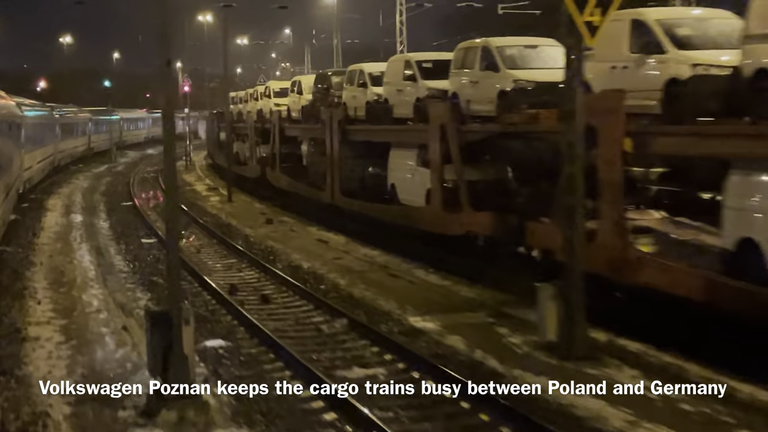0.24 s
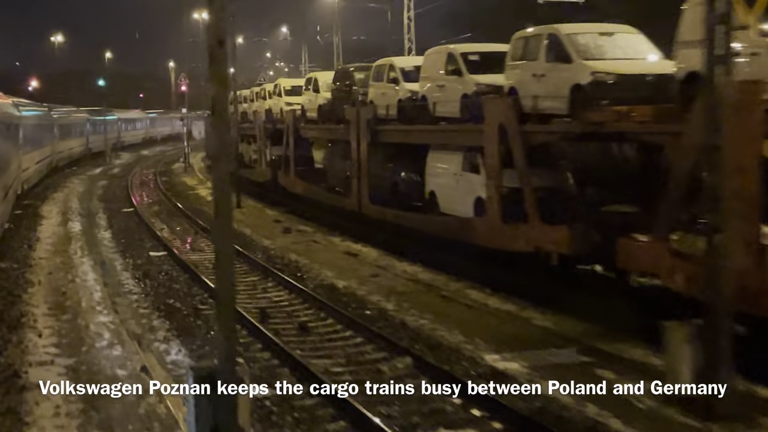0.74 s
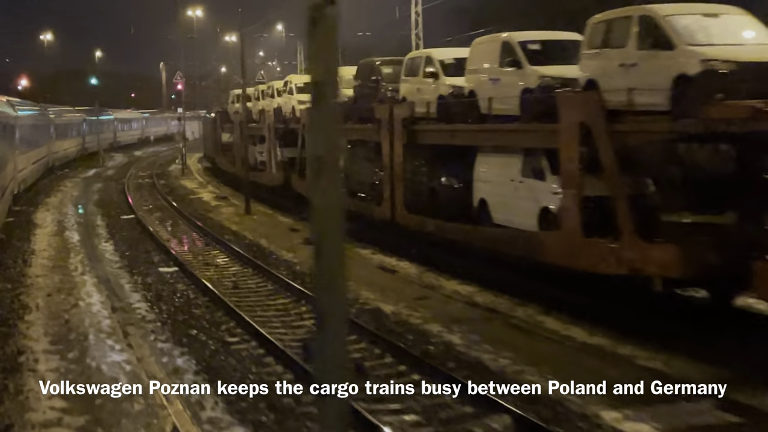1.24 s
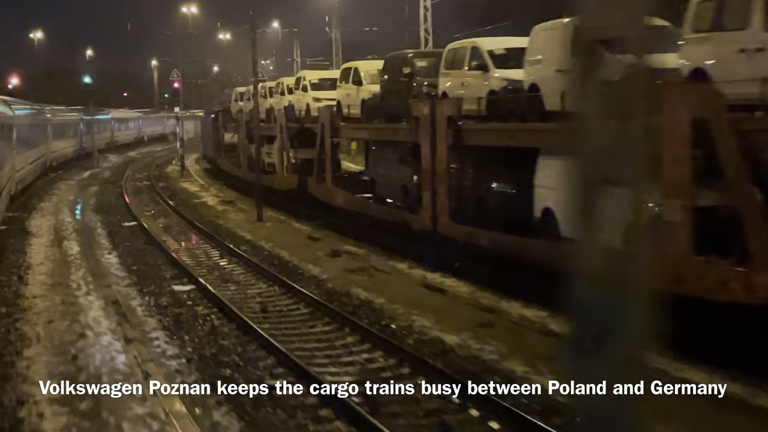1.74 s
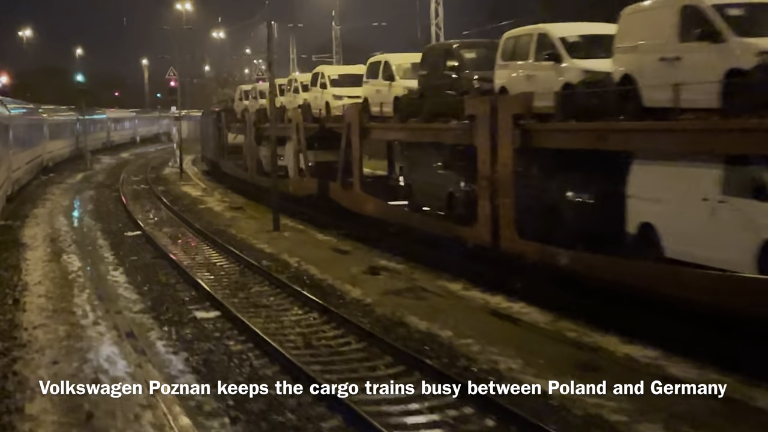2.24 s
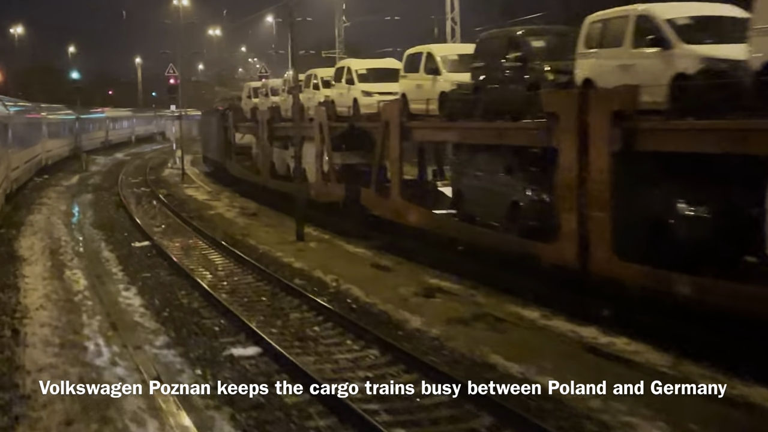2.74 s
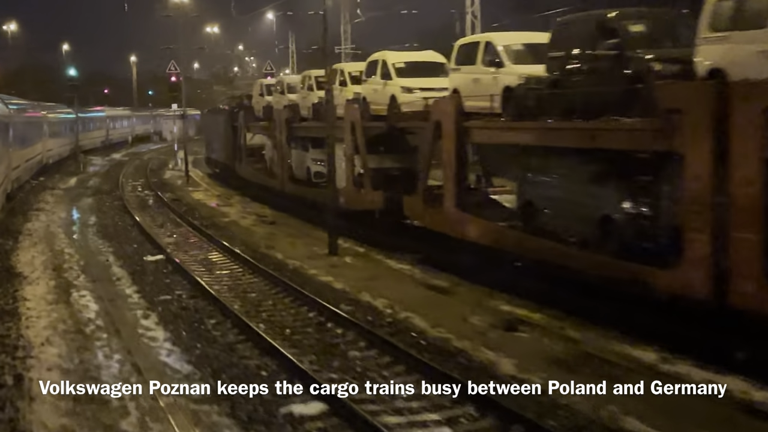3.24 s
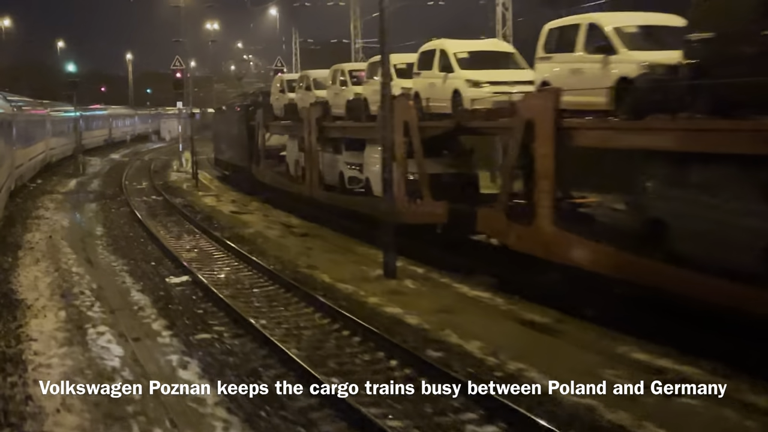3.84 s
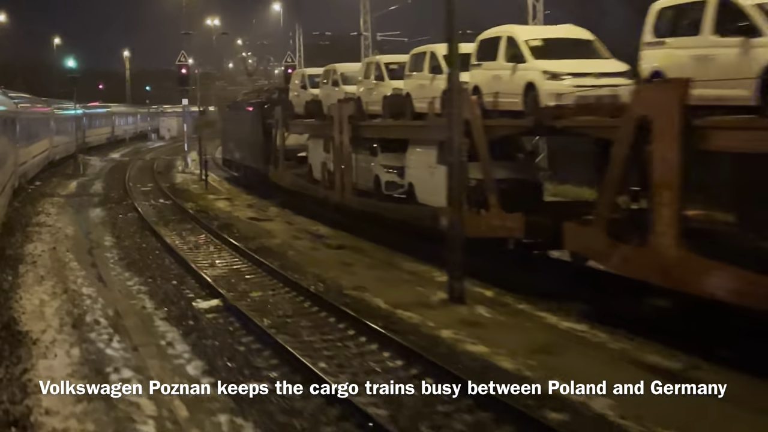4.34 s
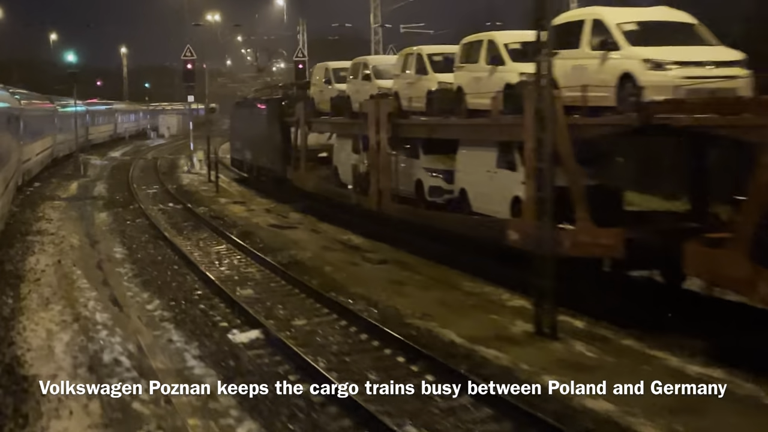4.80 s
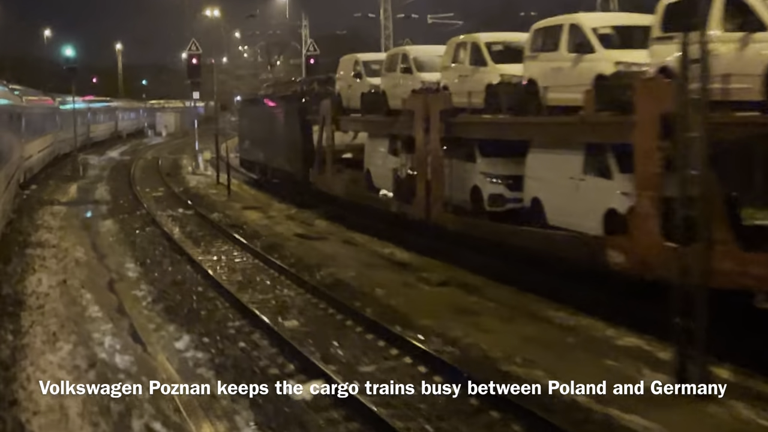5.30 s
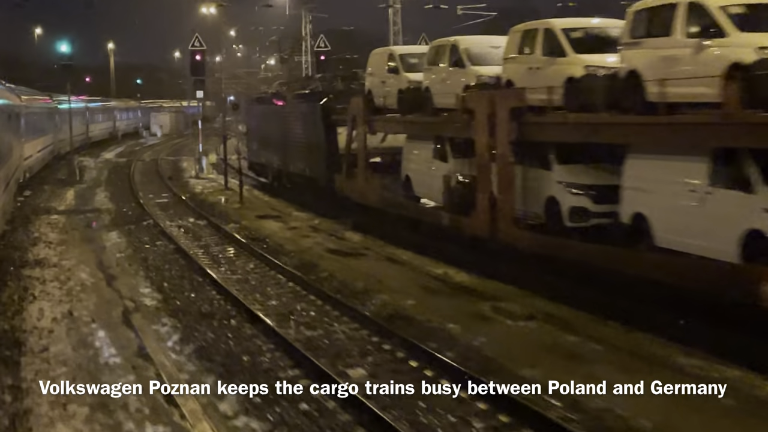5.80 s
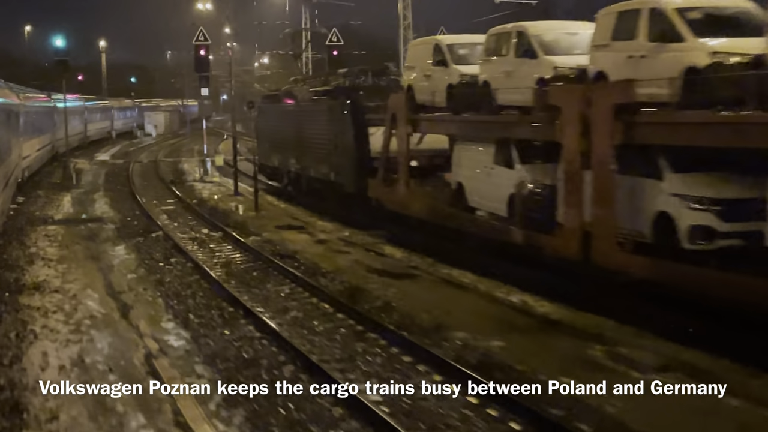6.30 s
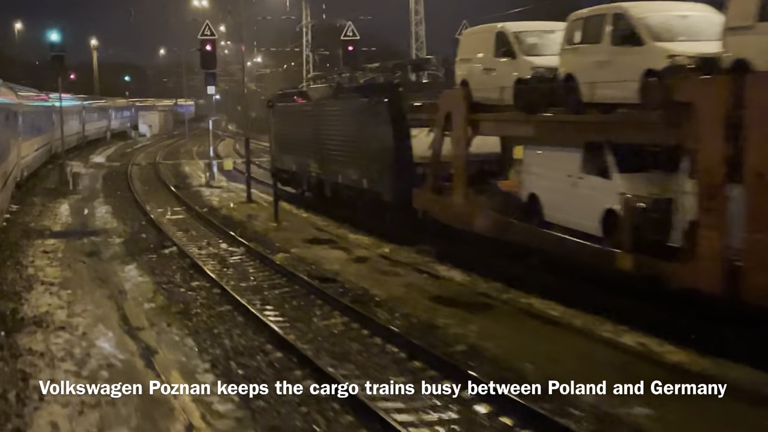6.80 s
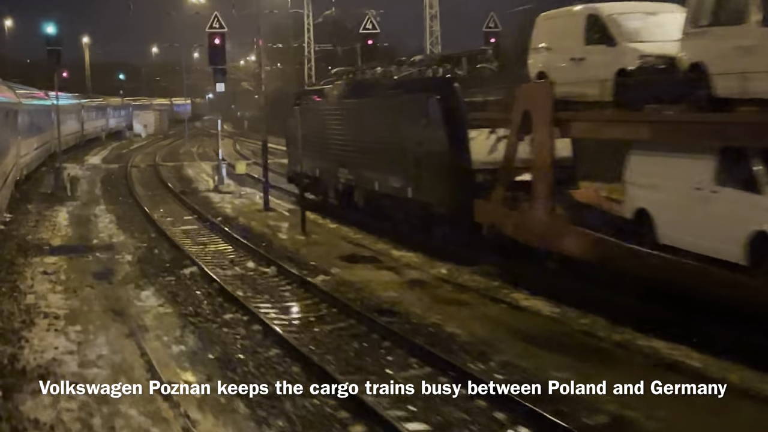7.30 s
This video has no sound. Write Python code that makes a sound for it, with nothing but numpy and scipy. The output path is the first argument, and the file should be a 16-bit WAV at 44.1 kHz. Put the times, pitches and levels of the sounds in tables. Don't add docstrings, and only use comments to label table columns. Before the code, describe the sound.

A train rolls steadily through an open rail yard, heard through a small stereo microphone at an open window. From 0 to about 7.5 seconds a rough bass rumble and boxy boom of the car body continues, wavering slightly, dipping near 1 second. A thin, steady metallic wheel whine rings high above it, with faint air and rail hiss. Wind strikes the microphone throughout: deep soft thumps, dull thuds and short ragged pops falling in pitch, scattered irregularly over many weaker ones. Tiny high wheel squeals flicker around 2.2 seconds, a softer longer one near 2.8, and lower ones near 4.2 and 4.8. A heavy thud lands about 4.15, and the sharpest pop snaps at 6.55. Rolling grows a little fuller after 5.3, and from 7 seconds buffeting and hiss rise, ending still in motion.

```python
import sys
import numpy as np
from scipy import signal
from scipy.fft import rfft, irfft, next_fast_len
from scipy.io import wavfile
from scipy.ndimage import uniform_filter1d, map_coordinates

SR = 44100
rng = np.random.default_rng(int(sys.argv[2]) if len(sys.argv) > 2 else 0)


def file_out(sig):
    cols = np.atleast_2d(sig).T
    lim = np.clip(cols, -1, 1)
    pcm = np.round(lim * 32767).astype(np.int16)
    wavfile.write(sys.argv[1], SR, pcm)


def elevation(decibels):
    levels = np.asarray(decibels, float)
    return 10 ** (levels / 20)


N = 332955


def unit(x):
    return x / np.sqrt(np.mean(x ** 2) + 1e-20)


def along(points, hz):
    f, v = np.transpose(points)
    return np.interp(np.log(hz + 1), np.log(f + 1), v)


def curves(rows):
    s, *columns = np.transpose(rows)
    return [np.interp(np.arange(N) / SR, s, column) for column in columns]


def wobble(rate):
    knots = rng.standard_normal(int(N * 200 / SR) + 4)
    return map_coordinates(knots, [np.arange(N) * rate / SR])


def filtered(x, response):
    m = next_fast_len(N + SR // 2)
    return irfft(rfft(x, m) * response(np.fft.rfftfreq(m, 1 / SR)), m)[..., :N]


def noise(gain, patchy_db, channels=1):
    z = signal.stft(rng.standard_normal((channels, N)), nperseg=512)[2]
    field = uniform_filter1d(rng.standard_normal(z.shape[1:]), size=4, axis=0)
    field = uniform_filter1d(field, size=10, axis=1)
    patchy = signal.istft(z * elevation(patchy_db * unit(field)), nperseg=512)[1][:, :N]
    return unit(filtered(patchy, gain))


def hump(hz, centre, width):
    return 1 / (1 + (2 * (hz - centre) / width) ** 2)


# (time [s], buffeting level [dB], rolling level [dB])
DRIVE = [(0.0, -38, -33), (.5, -39.5, -33.5), (1.01, -40, -37.5), (1.6, -41, -34), (2.08, -35.5, -33.5),
         (2.9, -38, -33), (3.3, -36.5, -33), (3.7, -36, -34), (4.5, -34, -34.5), (4.84, -38, -33),
         (5.28, -37, -30.5), (5.57, -38.5, -33), (6.2, -35.5, -30), (6.8, -40.5, -32.5), (7.15, -31.5, -31),
         (7.55, -30.5, -30)]
# (frequency [Hz], level per Hz [dB])
BODY_COLOUR = [(53, -72), (90, -6.5), (156, -21), (249, -3.5), (408, -3), (512, -6.5), (609, -10),
               (1340, -20.5), (1620, -20), (1870, -33), (2200, -45), (2860, -23), (4840, -120)]
# (frequency [Hz], width [Hz], lift [dB])
BODY_BOOMS = [(238.3, 13, 8), (501, 41, 5), (838, 210, 6)]


def rolling():
    def body(hz):
        booms_db = sum(db * hump(hz, centre, width) for centre, width, db in BODY_BOOMS)
        return elevation(along(BODY_COLOUR, hz) + booms_db)

    rolling_db = curves(DRIVE)[1]
    return elevation(rolling_db - 1.5 + 0.8 * wobble(18)) * noise(body, patchy_db=1.5)


# (time [s], wheel ring level [dB], hiss level [dB])
WHINE = [(0.0, -37.5, -62.5), (7.08, -37.5, -58.5), (7.55, -38.5, -56.5)]
WHEEL_PITCHES = [1560, 1650, 1780, 2300, 2770, 2830, 2851, 2960, 3110, 3153, 3250, 3340, 4050, 4147, 4140,
                 4250, 6000, 6120, 6050, 8295, 8300, 8950, 12440]
# (width [Hz], level [dB])
WHEEL_MODES = [(120, -18.5), (70, -16), (40, -19), (140, -20), (64.8, -14.5), (70, -4.5), (13.1, 3),
               (129, -11), (240, -11), (38, -11), (90, -19.5), (90, -15.5), (107, -19.5), (17.28, -13.5),
               (111.11, -19), (106, -18), (110, -23), (150, -23), (550, -26.5), (210, -36), (600, -25),
               (100, -28), (200, -26.5)]
# (frequency [Hz], level per Hz [dB])
HISS_COLOUR = [(700, 10.5), (1150, 19.5), (1400, 7), (2000, 15), (3700, 10), (4600, 7), (5500, 4.5),
               (7000, 1), (9200, 2.5), (10500, -3), (11600, 2.5), (12700, -6), (13100, 4), (13700, -17)]


def wheels(channels):
    def modes(hz):
        rings = zip(WHEEL_PITCHES, WHEEL_MODES)
        return np.sqrt(sum((elevation(db) * hump(hz, pitch, width)) ** 2 for pitch, (width, db) in rings))

    ring_db, hiss_db = curves(WHINE)
    ring = elevation(-0.03 + 0.4 * wobble(17)) * noise(modes, patchy_db=0.1, channels=channels)
    hum_hz, hum_width_hz, hum_db = 1256, 9, -19
    hum = elevation(hum_db) * noise(lambda hz: hump(hz, hum_hz, hum_width_hz), 0, channels=channels)
    air = noise(lambda hz: elevation(along(HISS_COLOUR, hz)), 0.83, channels=channels)
    hiss = elevation(hiss_db + 15 + 1.3 * wobble(5)) * air
    return elevation(ring_db) * (squealing(ring) + hum) + hiss


# (frequency [Hz], level per Hz [dB])
DIFFUSE_COLOUR = [(29, -32), (50, -13), (81, -2), (200, -7), (236, 1), (362, -21), (513, -4), (798, -13),
                  (1610, -15.5), (1900, -32.5), (2470, -64), (4180, -120)]
# (frequency [Hz], level per Hz [dB])
BUFFET_COLOUR = [(12, -51), (20, -36), (43, 7.5), (64, 7), (135, 3), (200, -10), (260, -63), (440, -120)]


def surround():
    buffet_db, rolling_db = curves(DRIVE)
    far = noise(lambda hz: elevation(along(DIFFUSE_COLOUR, hz)), patchy_db=-2.5)
    far = elevation(0.47 * rolling_db - 26.5 + 0.88 * wobble(7)) * far
    gusts = noise(lambda hz: elevation(along(BUFFET_COLOUR, hz)), patchy_db=1.0)
    return far + elevation(buffet_db - 9.5 + 2.6 * wobble(8)) * gusts


def slipstream():
    buffet_db, rolling_db = curves(DRIVE)
    lumps = elevation(1.2 * wobble(9))
    gusts = unit(lumps * noise(lambda hz: elevation(along(BUFFET_COLOUR, hz)), patchy_db=0.7))
    low = elevation(buffet_db + 4.17) * gusts + thumps()

    sweep_cycles = 1.2
    strong = elevation(-2.45) * chirps(pops(), sweep_cycles)
    # time [s], then thud, core and bite levels [dB]
    weak_rows = rng.uniform(size=(400, 4)) * [N / SR, 14, 14, 12] - [0, 5, 8.5, 13]
    weak = elevation(rolling_db - 2.0 + 1.2 * wobble(7)) * unit(chirps(weak_rows, sweep_cycles))
    return low + strong + weak


# (frequency [Hz], width [log units])
POP_PARTS = [(232, 0.34), (430, 0.33), (790, 0.44)]


def chirps(rows, cycles):
    s, *levels_db = np.transpose(rows)
    first_cycles, spread_cycles = [[0], [-1], [1]], [[0], [-1.44], [2.223]]
    main_size, largest_size = [[1], [0], [0]], [[0], [0.69], [0.55]]
    out = np.zeros(N)
    for (centre, width), band_db in zip(POP_PARTS, levels_db):
        late, turns, size = rng.uniform(size=(len(s), 3, 3)).T
        push_s = s + (late * spread_cycles + first_cycles) / centre
        at = np.clip(push_s * SR, 0, N - 1).astype(int)
        push = np.exp(2j * np.pi * turns) * (size * largest_size + main_size)

        def sweep(hz):
            bell = -.5 * (np.log(hz / centre + 1e-9) / width) ** 2
            return np.exp(bell - 2j * np.pi * cycles * np.log(hz + 1))

        peak = SR / (5 * centre * width)
        for part, turn in ((push.real, 1), (push.imag, 1j)):
            pushes = np.bincount(at.ravel(), (part * elevation(band_db) * peak).ravel(), N)
            out += filtered(pushes, lambda hz: turn * sweep(hz))
    delay = round(cycles / 450 * SR)
    return np.pad(filtered(out, body_ring)[delay:], (0, delay))


def body_ring(hz):
    centre, width, _ = BODY_BOOMS[0]
    damping = 1j * hz * width
    return 1 + 0.61 * damping / (centre ** 2 - hz ** 2 + damping)


# (time [s], peak level [dB])
THUD_EDDIES = [(.05, -12.5), (0.04, -24), (.376, -19.5), (0.692, -17), (.75, -13.5), (1.432, -13.5),
               (1.63, -18), (1.723, -12.5), (1.757, -13.5), (1.982, -15.5), (2.044, -10.5), (2.108, -13),
               (2.418, -18.5), (2.501, -12.5), (2.726, -13.5), (2.851, -15), (3.522, -18), (4.064, -13.5),
               (4.152, -8.5), (5.235, -16.5), (4.996, -15), (5.437, -12.5), (5.574, -13.5), (5.914, -14),
               (5.965, -31), (6.231, -11), (6.459, -14.5), (6.689, -15.5), (7.022, -20.5), (7.451, -14)]
# (time [s], peak level [dB], thud against the peak [dB])
KNOCK_EDDIES = [(.474, -13, 1), (.046, -12, 0), (0.674, -16.5, -1.5), (1.035, -17, -3), (1.519, -17, 0),
                (2.006, -17, 2), (2.267, -16, 3.5), (2.681, -13.5, -2.5), (7.245, -15, -8),
                (2.747, -14.5, -0.5), (6.136, -18.5, 0), (2.95, -16, -2), (3.042, -15.5, -1.5),
                (3.078, -17, 0.5), (2.889, -19, -6), (3.541, -13.5, -16), (3.779, -13, -6),
                (3.844, -16, -1), (4.287, -12, -6.5), (4.982, -10.5, -21), (5.014, -14, -16),
                (5.469, -13.5, 2), (5.652, -14.5, -1), (5.733, -12, -6.5), (5.799, -15, -4),
                (5.925, -11.5, -12), (6.347, -11.5, -5), (6.715, -15.5, -20), (7.26, -10.5, -1.5),
                (7.469, -16.5, -5)]
# (time [s], peak level [dB], thud against the peak [dB], bite against the peak [dB])
SNAP_EDDIES = [(0.917, -18, 4, -3), (.94, -15, -15, -6), (1.131, -17, 3.5, -3), (1.182, -17.5, -1.5, -8),
               (1.243, -13, -1.5, -3), (1.885, -19.5, 5, -7), (2.095, -13, -9, -9), (2.165, -16.5, 1, -9),
               (2.543, -13, -6, -12), (3.569, -16, -0.5, -5), (3.712, -14, 0, -14), (4.232, -14, -16, -5),
               (4.318, -13.5, -2, -15), (4.339, -17, -16, 0.5), (4.454, -18, -20, -5),
               (4.502, -16.5, 3, -9), (4.547, -17.5, 0, -6), (5.051, -15, 2.5, -9), (5.195, -16, -6, -6),
               (5.499, -15.5, 4, -6), (5.978, -14, -14, -6), (6.216, -13, 1.5, -17),
               (6.55, -6.5, -4.5, -5.5), (6.853, -13, -5, -13), (6.939, -16.5, -2, -8),
               (7.055, -13, -9, -2.5), (7.084, -15.5, 1.5, -5), (7.181, -12, -5, -9), (7.2, -14.5, -1, -5),
               (7.36, -21, 7.5, -5)]


def pops():
    thuds = [(s, db, db - 8.5, db - 20) for s, db in THUD_EDDIES]
    knocks = [(s, db + weight_db, db, db - 24) for s, db, weight_db in KNOCK_EDDIES]
    snaps = [(s, db + weight_db, db, db + edge_db) for s, db, weight_db, edge_db in SNAP_EDDIES]
    return thuds + knocks + snaps


# (time [s], peak level [dB], pitch [Hz])
THUMP_EDDIES = [(.384, -28, 99), (.701, -19.5, 76), (0.964, -20, 82), (1.37, -16, 63), (1.466, -16, 76),
                (1.925, -23, 85), (2.138, -18, 69), (2.315, -17.5, 70), (2.43, -14.5, 94), (2.506, -18, 84),
                (2.571, -28, 83), (3.03, -31, 60), (3.19, -12.5, 64.5), (3.336, -18.5, 66),
                (3.56, -13.5, 88), (3.677, -20, 73), (4.163, -22.5, 76), (4.411, -15, 76), (4.527, -20, 82),
                (4.874, -17.5, 82), (5.45, -17, 107), (5.757, -19, 85), (6.311, -16, 68.6),
                (6.482, -13.5, 104), (6.667, -14.5, 65.4), (6.909, -25, 59), (7.018, -14, 83),
                (7.142, -16, 71), (7.216, -14, 80), (7.308, -13, 70)]


def thumps():
    wake_s, wake_db, wake_hz = 0.0137, -9, 82
    wakes = [(s + wake_s, db + wake_db, wake_hz) for s, db, *_ in KNOCK_EDDIES + SNAP_EDDIES]
    rows = THUMP_EDDIES + wakes
    half = 2000
    out, t = np.zeros(N + SR), np.arange(-half, half) / SR
    draws = rng.uniform(size=(len(rows), 2)) * [1, 7] + [0, 7]
    for (s, db, hz), (turns, ms) in zip(rows, draws):
        bell = np.exp(-.5 * (1000 * t / ms) ** 2)
        swing = bell * np.sin(2 * np.pi * (hz * t * (1 - 6 * t) + turns))
        out[round(s * SR):][:len(t)] += elevation(db - 4.0) * swing
    return out[half:][:N]


# (time [s], half length [s], lift [dB], pitch [Hz], reach [Hz])
SQUEALS = [
    (2.28, 0.041, 6, 6050, 1100),
    (2.28, .04, 12, 8300, 900),
    (2.2, 0.034, 11, 3280, 250),
    (4.16, 0.055, 10.5, 2300, 200),
    (4.8, .04, 11, 2300, 200),
    (2.775, 0.086, 5.5, 2770, 440),
]


def squealing(ring):
    hz, t, z = signal.stft(ring, SR, nperseg=512)
    lift_db = 0
    for s, half_s, db, pitch, reach in SQUEALS:
        lift_db = lift_db + db * np.outer(hump(hz, pitch, reach), np.exp(-((t - s) / half_s) ** 2))
    return signal.istft(z * elevation(lift_db), SR, nperseg=512)[1][:, :N]


# (frequency [Hz], phase [radians])
PORT_LEAD = [(100, .15), (600, .6), (1130, 1.7), (1350, .9), (1500, -.4), (2000, .1), (2830, .3),
             (3600, .1), (4200, .22), (5100, .3), (5200, .95), (5750, 1.1), (6300, .45), (7350, .9),
             (7420, -1.6), (7850, -np.pi), (8300, -3.6), (8750, -np.pi), (9000, -3.9), (10300, -5.9),
             (11650, -7.4), (12700, -8.7), (13000, -3 * np.pi)]


def scene():
    ports = lambda hz: np.exp(np.outer([-.5j, .5j], along(PORT_LEAD, hz)))
    train = filtered(rolling() + wheels(channels=1), ports)
    wind = slipstream() * elevation([[-.1], [.1]])
    return train + wind + elevation(-13) * wheels(channels=2) + [[1], [-1]] * surround()


def roll_off(x):
    return signal.sosfilt(signal.butter(12, 13760, fs=SR, output="sos"), x)


# (lowest frequency [Hz], highest frequency [Hz])
MONO_BANDS = [(1950, 2550), (3480, 3980), (6330, 6880), (10350, 11700), (13100, 14000)]


def record(dry):
    both = [dry[0] + dry[1], dry[0] - dry[1]]
    hz, t, (mid, side) = signal.stft(both, SR, nperseg=1024, boundary="even")
    power = uniform_filter1d(np.abs([mid, side]) ** 2, size=5, axis=1)
    power = uniform_filter1d(power, size=3, axis=2)

    least_db = -27 + 7.5 * ((hz > 3400) & (hz < 5100))
    strong = (power[1] > elevation(least_db)[:, None] * power[0]) | (hz[:, None] < 1800)
    wide = ~np.any([(hz > lo) & (hz < hi) for lo, hi in MONO_BANDS], axis=0)
    kept = [mid * (hz < 12860)[:, None], side * strong * wide[:, None]]
    mid, side = signal.istft(kept, SR, nperseg=1024)[1][:, :N] / 2
    return roll_off(np.array([mid + side, mid - side]))


dry = scene()
out = record(dry)
file_out(out)
```